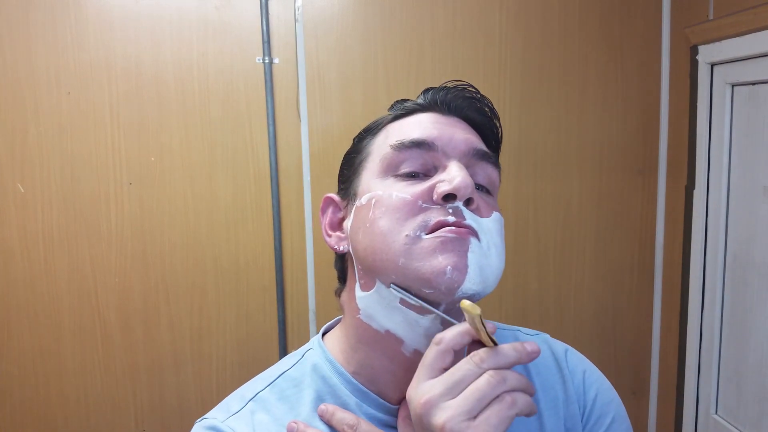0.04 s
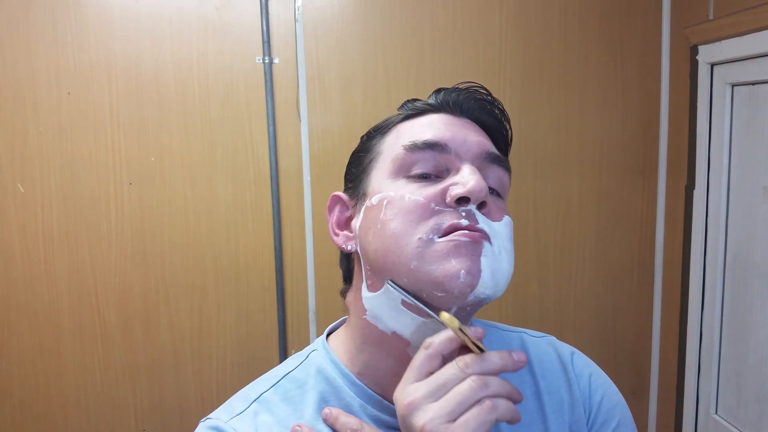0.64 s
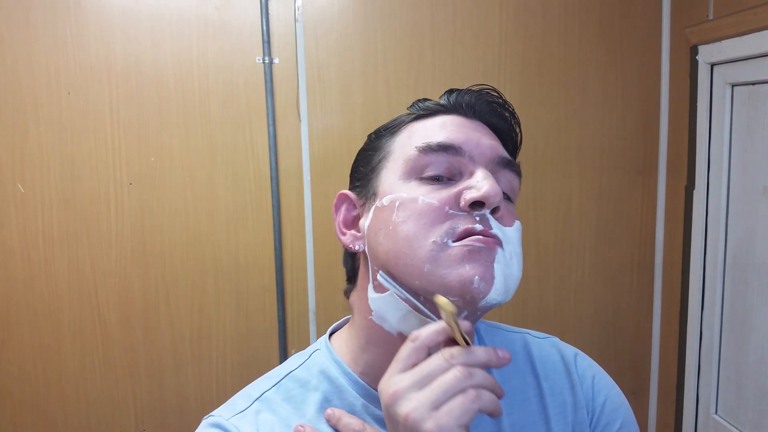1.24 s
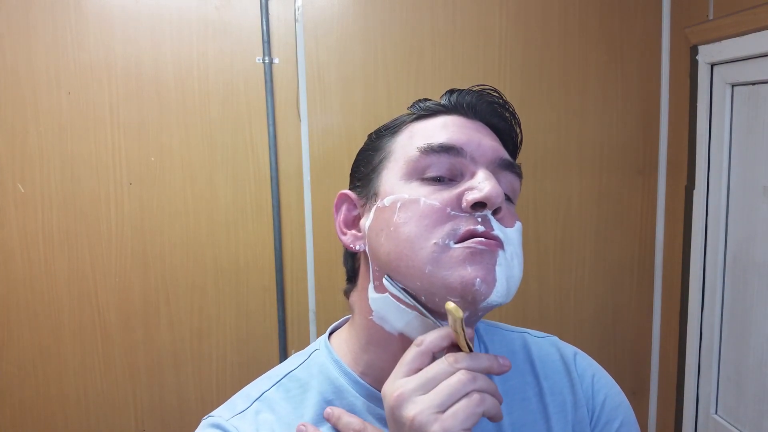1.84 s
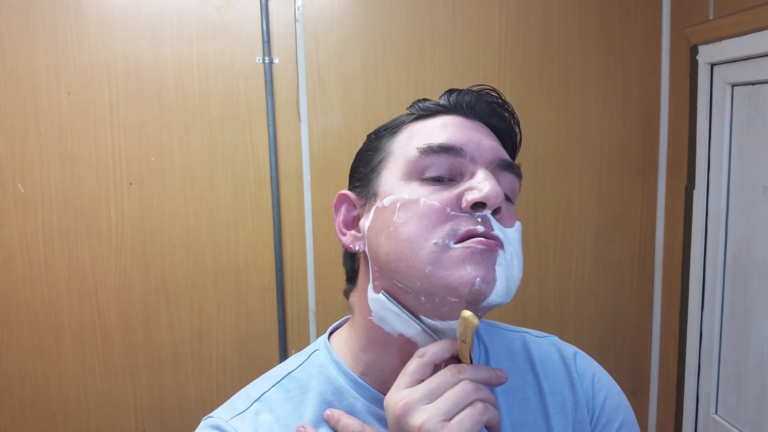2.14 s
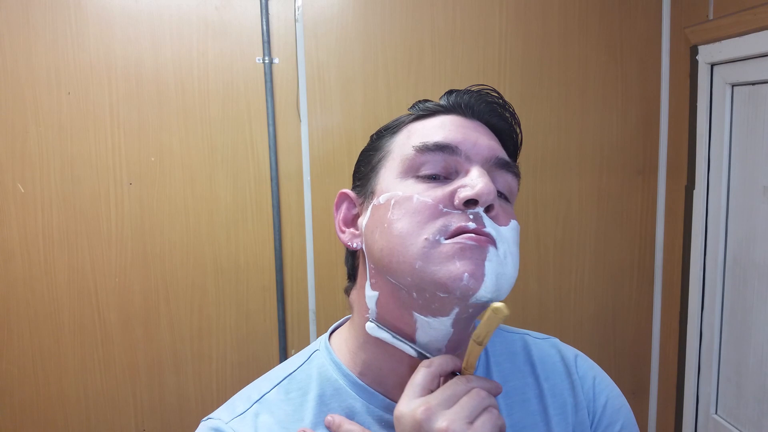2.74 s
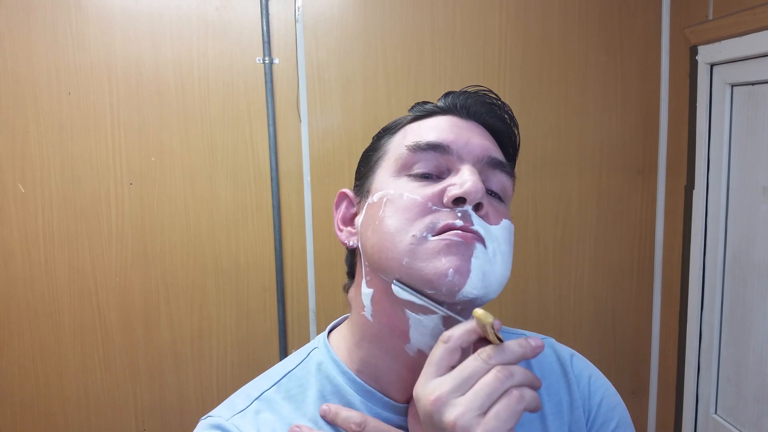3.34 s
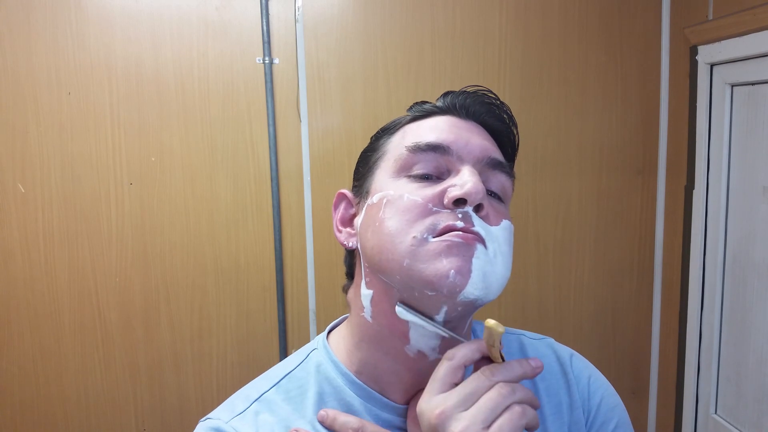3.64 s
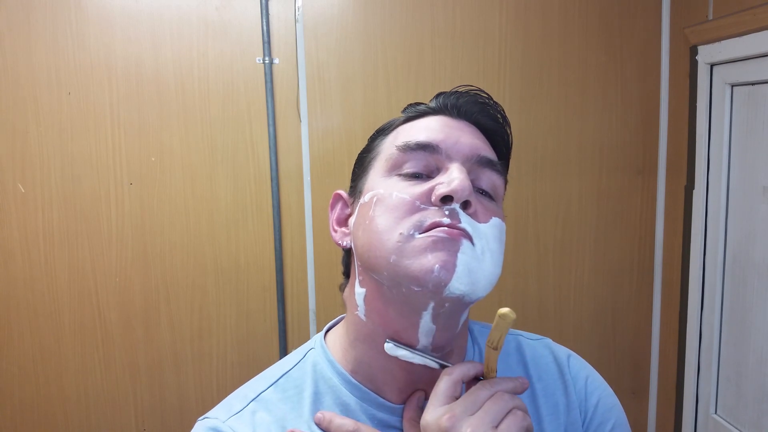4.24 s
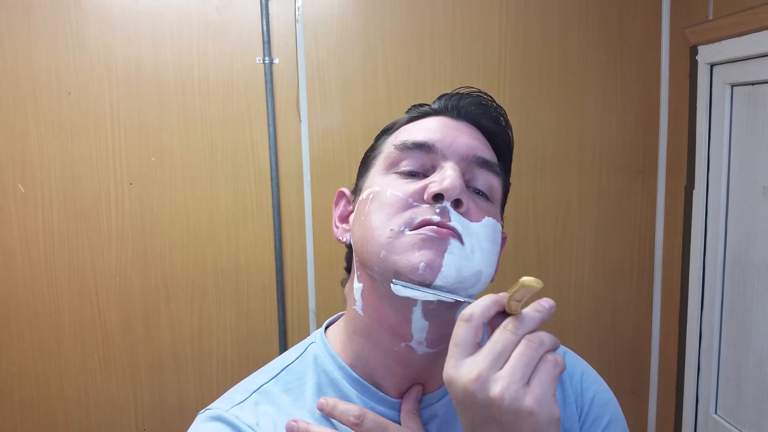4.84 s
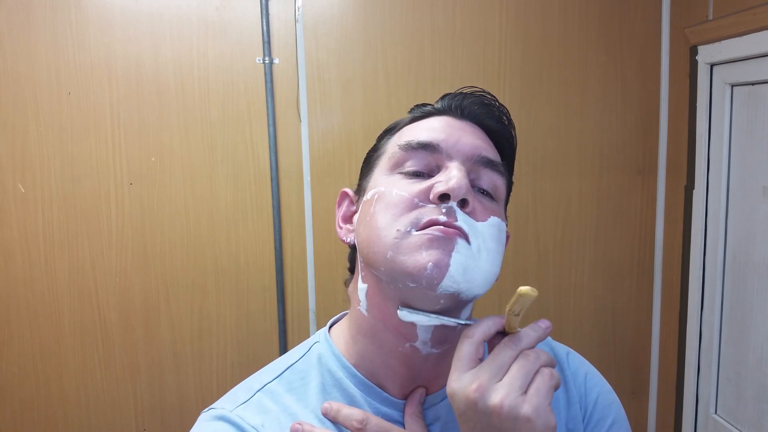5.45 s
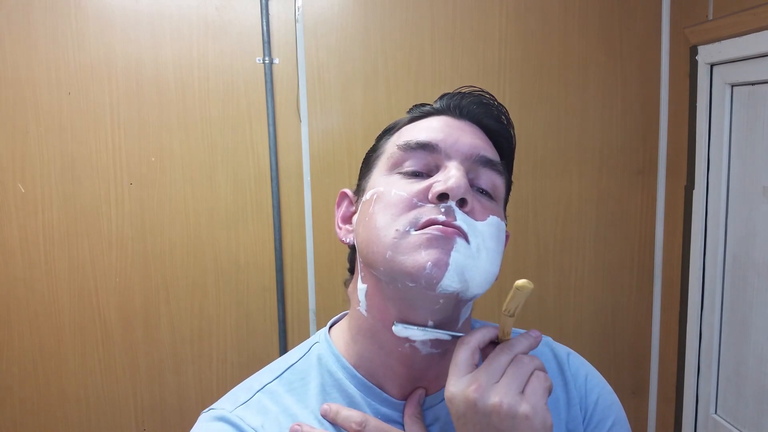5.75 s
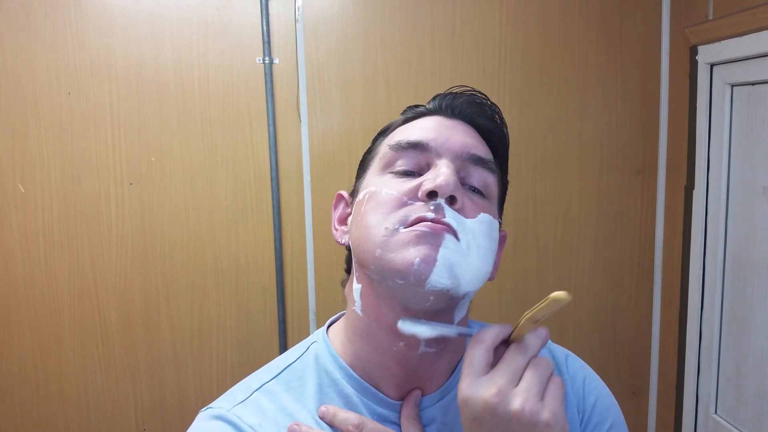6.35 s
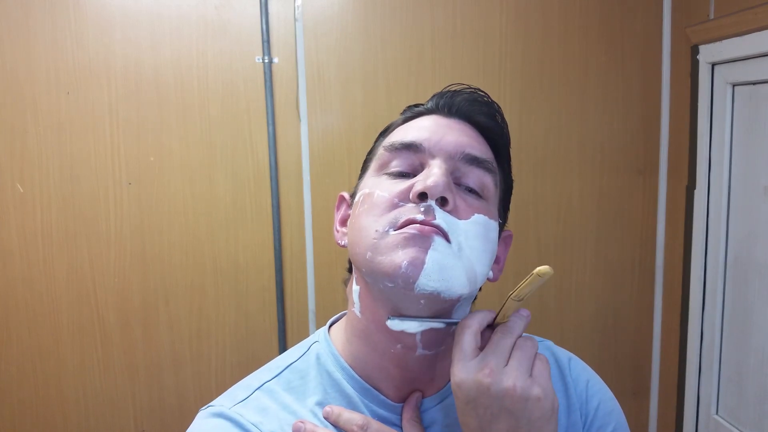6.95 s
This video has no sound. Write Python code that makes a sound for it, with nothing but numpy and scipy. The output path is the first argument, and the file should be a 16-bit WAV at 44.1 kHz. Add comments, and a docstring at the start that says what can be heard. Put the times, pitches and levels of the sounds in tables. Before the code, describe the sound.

A straight razor scrapes through lathered stubble in quick crisp flicks, then slower pulls, over a low machinery drone.

```python
"""Over a low drone, a straight razor flicks four times through lathered stubble, then takes three
long slow pulls among lighter brushes, close up in a small panelled room. Each cut hair is a tiny
bright snap; in the quick flicks the thin blade rings as well. The drone is machinery behind the
walls, its close tones beating over the rush of ventilation."""
import sys
import numpy as np
from scipy import signal
from scipy.fft import rfft, irfft
from scipy.io import wavfile
from scipy.ndimage import uniform_filter1d

SR = 44100
rng = np.random.default_rng(int(sys.argv[2]) if len(sys.argv) > 2 else 0)


def wav_record(signal):
    """Record a signal, one row per channel, as 16-bit PCM in the file named by sys.argv[1]."""
    frames = np.transpose(np.atleast_2d(signal))
    bounded = np.clip(frames, -1, 1)
    # unit amplitude maps onto the largest positive 16-bit level
    quanta = np.round(bounded * 32767).astype(np.int16)
    wavfile.write(sys.argv[1], SR, quanta)


N = 308700
TIME = np.arange(N) / SR
BIN_HZ = np.fft.rfftfreq(N, 1 / SR)

# room rumble, the bottom of the noise bed: f/Hz, left density/dB, right density/dB
RUMBLE_SPECTRUM = [(15.2, -61.5, -59.5), (28.4, -80, -72), (50.7, -64, -61.5), (84.6, -57, -56.5),
                   (125.4, -54, -63), (173.5, -70.5, -68.5), (235.6, -66.5, -70.5), (259.4, -73.5, -87.5),
                   (295, -77.5, -73), (490, -77, -81), (617, -82, -84), (880, -80, -89.5)]
# ventilation air, the top of the bed: f/Hz, left density/dB, right density/dB
AIR_SPECTRUM = [(1120, -88, -88.5), (1450, -90, -92.5), (2160, -87, -95.5), (2697, -92, -99),
                (3320, -102, -104), (3730, -108, -106), (4140, -102, -105), (5030, -104, -107),
                (5720, -116, -114), (7660, -124, -123), (9500, -123, -124), (11100, -109, -115),
                (15600, -108, -108)]
# how centred the bed sits: f/Hz, left-right correlation
BED_CORRELATION = [(60, 0.44), (92, 0.13), (140, 0.098), (210, 0.55), (330, 0.76), (500, 0.23),
                   (800, 0.0082)]
# draught riding the low rush: t/s, relative level/dB
DRAUGHT_CURVE = [(0.1, -51), (0.65, -50), (2.81, -50), (2.84, -48.5), (3.19, -51), (3.66, -48.5),
                 (4.87, -50), (6.9, -49)]
# machinery tones: f/Hz
MOTOR_PITCHES = [30.1, 48.6, 58.1, 60.1, 62.2, 80.4, 87.5, 90.0, 116.3, 120.0, 124.5, 135.0, 174.5, 248.2,
                 300.0]
# the same tones before their swells: left rms level/dB, right rms level/dB
MOTOR_LEVELS = [(-50.5, -48.5), (-46, -50.5), (-41.5, -41), (-44.5, -46.5), (-39, -40.5), (-47.5, -41),
                (-38.5, -39), (-46.5, -49.5), (-41, -51.5), (-42, -53), (-43.5, -60), (-53, -56.5),
                (-58.5, -62), (-61, -55.5), (-62.5, -67.5)]
# load on the slowest motors: t/s, relative level/dB
MOTOR_LOAD = [(0.1, -39), (0.38, -37), (5.61, -34.5), (6.9, -40.5)]
# quick flicks: deepest cut t/s, hold/s, build-up/s, relative cut level/dB, relative ring level/dB
FLICK_CUES = [(0.243, 0.056, 0.083, -47.5, -64), (0.818, 0.031, 0.11, -51, -64.5),
              (1.173, 0.03, 0.081, -52, -69.5), (1.531, 0.0084, 0.087, -49.5, -65.5)]
# slow pulls and light brushes: landing t/s, deepest cut t/s, lift t/s,
# relative level on landing/dB, relative level at the deepest cut/dB
PULL_CUES = [(0.0, 0.01, 0.062, -56, -63.5), (1.86, 2.237, 2.64, -76, -62.5), (2.78, 2.861, 3.6, -81, -74),
             (3.428, 3.72, 4.08, -64.5, -52), (5.1, 5.17, 5.19, -79, -61),
             (5.27, 5.637, 5.98, -68.5, -59.5), (6.15, 6.18, 6.2, -79, -77), (6.83, 6.98, 7.0, -79, -71)]
# the thickest hairs giving way: t/s, relative level/dB
SNAP_CUES = [(0.215, -37), (0.2624, -39), (0.2964, -41), (0.7492, -45), (1.1189, -48), (1.1837, -45),
             (1.4066, -50), (1.474, -49), (1.5424, -42), (1.8697, -46), (1.9739, -57), (2.06, -51),
             (2.1151, -52), (2.177, -55), (2.2458, -50), (2.3096, -53), (3.4775, -48), (3.625, -41),
             (3.772, -46), (3.8377, -40.5), (3.8735, -43), (4.0726, -51), (5.1652, -56), (5.2809, -45.5),
             (5.6276, -46), (6.833, -54)]
# bright colour of a hair being cut: f/Hz, left gain/dB, right gain/dB
CUT_EQ = [(2000, -38, -38), (3500, -22, -19), (5000, -19, -19), (6200, -19, -14), (7100, -22, -18),
          (7900, -25, -26), (8800, -14, -24), (9700, -4, -21), (10600, 0, -19), (11700, 1, -15),
          (12600, -6, -17), (13300, -6, -17), (14000, -12, -16), (15500, -12, -14)]
# ringing modes of the blade: f/Hz, bandwidth/Hz, left gain/dB, right gain/dB
BLADE_MODES = [(2780, 250, -7, 7.5), (4630, 840, -18, -4), (6130, 680, -8, 3), (7300, 650, -6.5, -2),
               (8370, 1400, -3.5, -15), (10700, 1100, -10, -26), (13500, 2200, -6, -19.5)]


def from_db(db):
    """Decibels to gain."""
    return 10 ** (np.asarray(db) / 20)


def rms_one(x):
    """Scale to rms 1."""
    return x / np.sqrt(np.mean(x ** 2) + 1e-20)


def fader(rows):
    """A gain ride through (t/s, level/dB) points, scaled to rms 1."""
    return rms_one(from_db(np.interp(TIME, *np.transpose(rows))))


def per_bin(rows):
    """Each column of an (f/Hz, ...) table, read at every Fourier bin."""
    hz, *columns = np.transpose(rows)
    log_bins = np.log(np.maximum(BIN_HZ, 1))
    return np.array([np.interp(log_bins, np.log(hz), column) for column in columns])


def drift(rate_hz):
    """Smooth random modulation with spread 1."""
    return rms_one(irfft(rfft(rng.standard_normal(N)) / (1 + (BIN_HZ / rate_hz) ** 2), N))


def decay(hits, release_s):
    """Give each hit an instant attack and an exponential tail."""
    return signal.lfilter([1], [1, -np.exp(-1 / (release_s * SR))], hits)


def ventilation(rush_low_hz=180, rush_high_hz=950):
    """A bed of rumble and air, wide in the treble; its low rush swells and sinks with the draught."""
    mid, side = rfft(rng.standard_normal((2, N))) * np.sqrt(SR) / 2
    alike = per_bin(BED_CORRELATION)[0]
    pair = np.sqrt(1 + alike) * mid + np.sqrt(1 - alike) * side * [[1], [-1]]
    bed = irfft(pair * from_db(per_bin(RUMBLE_SPECTRUM + AIR_SPECTRUM)), N)
    rush = irfft(rfft(bed) * ((BIN_HZ > rush_low_hz) & (BIN_HZ < rush_high_hz)), N)
    return bed + (fader(DRAUGHT_CURVE) - 1) * rush


def machinery(wander_rad=0.24, waver_db=2.0, slow_motor_hz=70):
    """Motors at slightly different speeds beat against each other; the lowest swell with the load."""
    drone, load = np.zeros((2, N)), fader(MOTOR_LOAD)
    for hz, (left, right) in zip(MOTOR_PITCHES, MOTOR_LEVELS):
        phase = 2 * np.pi * (hz * TIME + rng.random()) + wander_rad * drift(1.0)
        swell = from_db(waver_db * drift(1.0)) * (load if hz < slow_motor_hz else 1)
        drone += from_db([[left], [right]]) * swell * np.sqrt(2) * np.sin(phase)
    return drone


def room(x, wet_db=-7, t60_s=0.7, predelay_s=.004):
    """Dense reflections off the panels, with a different tail on each side."""
    age = TIME[:SR]
    tails = rng.standard_normal((2, SR)) * from_db(-60 * age / t60_s) * (age > predelay_s)
    tails /= np.sqrt(np.sum(tails ** 2, axis=1, keepdims=True))
    return from_db(wet_db) * signal.fftconvolve(x.mean(axis=0)[None], tails, axes=1)[:, :N]


def body_echoes(x):
    """The left side gets the razor directly; the shaded right gets early echoes off jaw and shoulder."""
    left, right = x
    for lag_s in (.0007, .0016, .0029):
        echo = np.r_[1, np.zeros(round(lag_s * SR)), -.5]
        right = signal.lfilter(echo[::-1], echo, right)   # allpass: smears the clicks, keeps their colour
    return np.array([left, right])


def stubble(hairs_per_s=1800, hair_spread_db=3.5, clumps_per_s=130, clump_db=3.8, friction=.2, glide=.55):
    """Hairs click against the edge over the hiss of steel on wet skin; levelled to rms 1."""
    hairs = rng.random(N) < hairs_per_s / SR
    sizes = from_db(hair_spread_db * np.minimum(rng.exponential(1, N), 3))
    clicks = hairs * sizes * rng.choice([-1, 1], N)
    # clumps of hair catch the edge at once and let go gradually
    clumps = rng.random(N) < clumps_per_s / SR
    catches = clumps * from_db(clump_db * np.minimum(rng.exponential(1, N), 2))
    power = glide + decay(catches, release_s=.003)
    grains = (clicks + friction * rng.standard_normal(N)) * np.sqrt(power)
    return grains / np.sqrt(uniform_filter1d(grains ** 2, size=1500) + 1e-9)


def thick_hairs(effort, snap_trim_db=7, strays_per_s=30, stray_db=-36, spread_db=2.5, follow=.75):
    """Thick hairs crack and tear on cue; strays snap at random, louder as the edge cuts harder."""
    sizes = from_db(stray_db + spread_db * rng.standard_normal(N)) * (effort / effort.max()) ** follow
    cracks = (rng.random(N) < strays_per_s / SR) * sizes
    for at_s, db in SNAP_CUES:
        cracks[round(at_s * SR)] += from_db(db + snap_trim_db)
    return rng.standard_normal(N) * decay(cracks + 1e-18, release_s=.0013)


def blade(clicks, trim_db=13.5):
    """The hollow-ground steel rings briefly in its modes."""
    ring = np.zeros((2, N))
    for hz, width, left, right in BLADE_MODES:
        mode = signal.butter(2, [hz - width / 2, hz + width / 2], "band", fs=SR, output="sos")
        ring += from_db([[left], [right]]) * signal.sosfilt(mode, clicks)
    return from_db(trim_db) * ring


def flicks(trim_db=3.5, depth_db=24, release_s=.068, ring_follow=.6):
    """Each flick digs in, holds briefly and leaves the skin: envelopes for the cut and for the ring."""
    effort, ring_drive = np.zeros(N), np.zeros(N)
    for deepest_s, hold_s, build_s, cut_db, ring_db in FLICK_CUES:
        early = np.maximum(deepest_s - hold_s / 2 - TIME, 0) / build_s
        late = np.maximum(TIME - deepest_s - hold_s / 2, 0) / release_s
        shape_db = -depth_db * np.minimum(early + late, 10)
        effort += from_db(trim_db + cut_db + shape_db)
        ring_drive += from_db(ring_db + ring_follow * shape_db)
    return effort, ring_drive


def pulls(trim_db=3, attack_s=.015, ease_db_per_s=42, lift_db_per_s=120, patch_db=1.6, patch_hz=18):
    """The cutting envelope as the edge lands, presses, eases off and peels away."""
    effort = np.zeros(N)
    for land_s, deepest_s, lift_s, landing_db, deepest_db in PULL_CUES:
        pressing_db = np.interp(TIME, [land_s, deepest_s], [landing_db, deepest_db])
        easing_db = ease_db_per_s * np.maximum(TIME - deepest_s, 0)
        lifting_db = lift_db_per_s * np.maximum(TIME - lift_s, 0)
        contact = np.clip((TIME - land_s) / attack_s, 0, 1)
        effort += contact * from_db(trim_db + pressing_db - easing_db - lifting_db)
    return effort * from_db(patch_db * drift(patch_hz))   # patchy stubble rasps unevenly


def razor(free_ring_db=-66):
    """All cuts share one bright colour; only the quick flicks set the blade ringing."""
    flicking, ring_drive = flicks()
    effort = flicking + pulls()
    grains = stubble()
    colour = from_db(per_bin(CUT_EQ))
    rasp = effort * grains / np.sqrt(np.mean(colour[0] ** 2))   # make-up gain for the left EQ
    cuts = irfft(rfft(rasp + thick_hairs(effort)) * colour, N)
    damping = np.sqrt(np.minimum(ring_drive / from_db(free_ring_db), 1))   # lather damps a light touch
    return cuts + blade(grains * ring_drive * damping)


def scene():
    """The razor up front with its reflections; drone and air behind."""
    shave = body_echoes(razor())
    return shave + room(shave) + machinery() + ventilation()


def record(dry):
    """A steep high cut at 15.8 kHz on the whole mix."""
    return signal.sosfilt(signal.ellip(12, .1, 90, 15800, fs=SR, output="sos"), dry)


dry = scene()
out = record(dry)
wav_record(out)
```